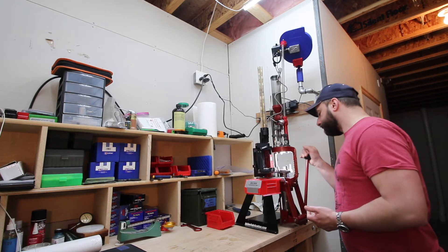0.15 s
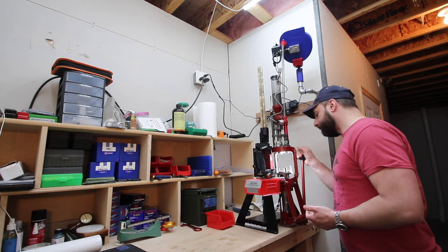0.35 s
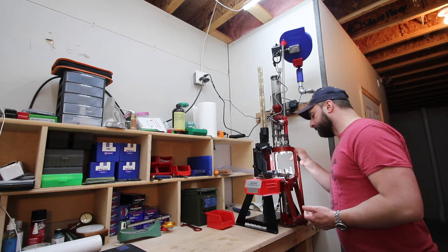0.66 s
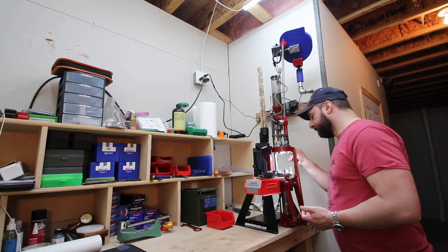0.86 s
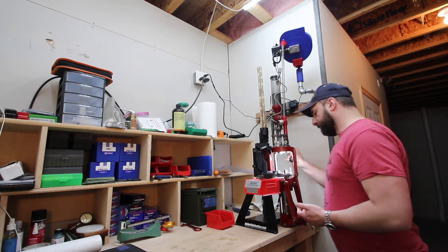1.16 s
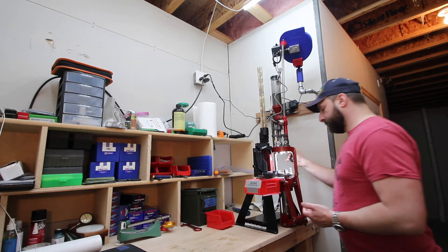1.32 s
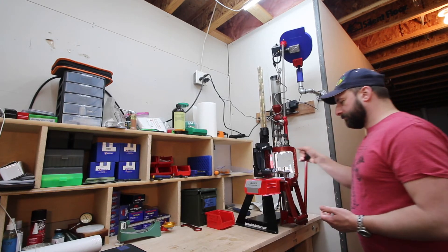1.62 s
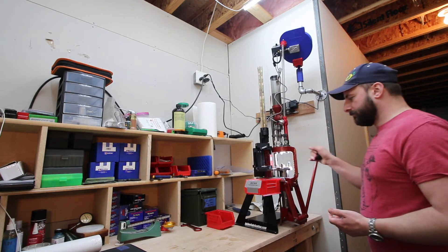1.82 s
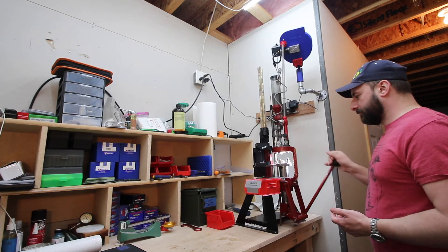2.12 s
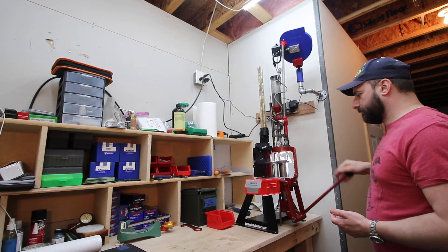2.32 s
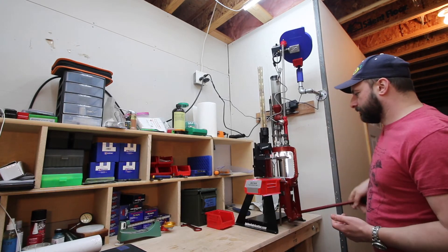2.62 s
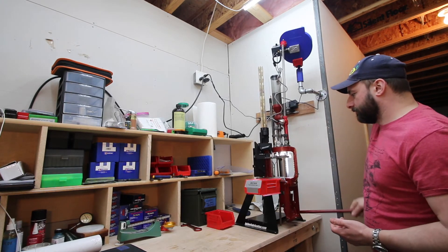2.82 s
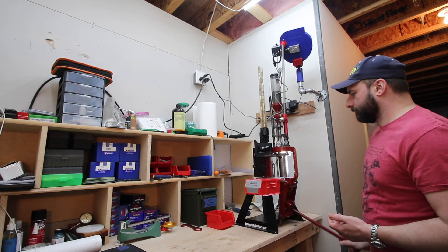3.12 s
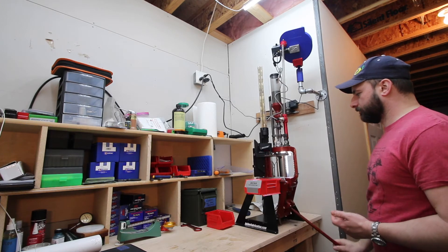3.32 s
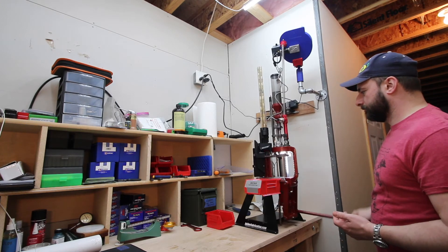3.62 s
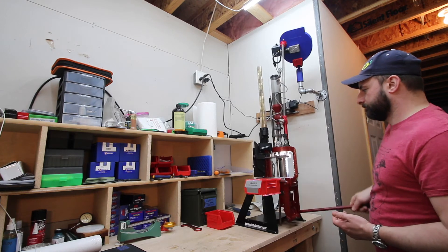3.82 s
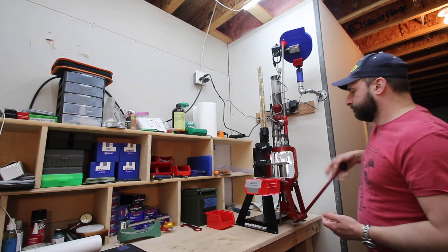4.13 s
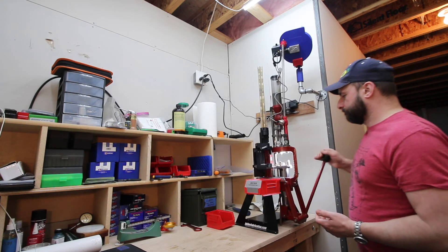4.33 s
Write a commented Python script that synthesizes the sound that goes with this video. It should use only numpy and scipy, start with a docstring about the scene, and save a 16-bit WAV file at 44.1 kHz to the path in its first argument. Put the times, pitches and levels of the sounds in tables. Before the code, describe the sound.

Quiet ticks and taps of handled metal open the scene, with a hollow tumbling rattle about half a second in. More soft clicks and short rubs follow, then a brass ring and a small lull. Louder iron clanks, gritty steel slides, a short groan and hum mark the lever's down stroke; the up stroke rattles and scrapes before fading. Close workshop reverberation, microphone a couple of metres away, faint room noise.

```python
"""A progressive reloading press worked by hand in a small workshop, a couple of metres from the microphone.
The lever goes down and up: blows ring the iron frame, slip grains scrape, and wavering tones squeal and hum.
Before that, small parts and brass cases are handled and one case rattles down a hollow chute, all as short
bursts of contacts filtered by resonances. Decaying notes give the ringing brass, loose parts and the thud of
the wooden bench at the end stops; noise tails give the room, and shaped noise its faint air."""
import sys
import numpy as np
from scipy import signal
from scipy.fft import rfft, irfft
from scipy.io import wavfile
from scipy.ndimage import uniform_filter1d

SR = 44100
rng = np.random.default_rng(int(sys.argv[2]) if len(sys.argv) > 2 else 0)


def pcm_store(signal):
    """Save signal as 16-bit PCM."""
    levels = np.round(np.clip(np.atleast_2d(signal), -1, 1) * 32767)
    wavfile.write(sys.argv[1], SR, levels.astype(np.int16).T)


N = 196774  # samples
BLOW_SIZE = 32768  # samples in one blow, note or room tail

# Small parts and cases in the hands. Each row: start in seconds, level in dB before the layer's gain,
# size of the part in cm, contact time in ms, rattle decay in seconds.
HANDLING_BLOWS = [(0.004, -40.5, 4.1, 0.72, 0.014), (0.025, -53, 18, 0.29, 0.03),
                  (0.147, -54, 12, 0.085, 0.0029), (0.157, -48, 6.3, 0.96, 0.0047),
                  (0.2245, -36.5, 1.83, 0.35, 0.0026), (0.326, -31.5, 7.8, 0.12, 0.0074),
                  (0.345, -23.5, 8.1, 0.26, 0.028), (0.435, -27.5, 8.4, 0.18, 0.025),
                  (0.458, -28, 5.9, 0.25, 0.0057), (0.496, -29, 10.7, 0.11, 0.0098),
                  (0.77, -41.5, 7, 0.18, 0.0071), (0.78, -34.5, 5.4, 0.49, 0.003),
                  (0.9, -65, 12, 1.2, 0.0063), (0.94, -52, 37, 0.14, 0.01), (1.03, -36.5, 150, 3.8, 0.06),
                  (1.051, -43, 11, 1.6, 0.0056), (1.105, -34.5, 33, 0.67, 0.012),
                  (1.132, -38, 17, 0.38, 0.005), (1.172, -40, 60, 2.8, 0.0038),
                  (1.222, -45, 13.3, 0.82, 0.0017), (1.378, -37.5, 6.9, 0.46, 0.016),
                  (1.45, -42, 9.9, 0.41, 0.013), (1.538, -38.5, 6.5, 0.26, 0.0068),
                  (1.59, -37.5, 7.2, 0.11, 0.0069), (1.66, -31, 13.7, 0.35, 0.011),
                  (1.778, -40, 6, 0.18, 0.013), (1.903, -33.5, 2.3, 0.11, .0012),
                  (1.955, -33, 6.9, 0.085, 0.017), (1.974, -25.5, 4.1, 0.16, .016),
                  (1.995, -20.5, 5.6, 0.63, 0.017), (2.003, -33.5, 47, 1.26, 0.013),
                  (2.19, -55.5, 6.2, 0.7, 0.028), (2.246, -52, 3.1, 0.22, 0.0022),
                  (2.263, -49.5, 9.5, 1.1, 0.0084)]
# A case bouncing down the chute. Each row: start in seconds, level in dB before the layer's gain,
# contact time in ms.
CHUTE_BOUNCES = [(0.518, -21, 0.18), (0.545, -24, 0.17), (0.567, -20, 0.37), (0.578, -17.5, 0.19),
                 (0.585, -23, 0.58), (0.609, -28.5, 0.87), (0.625, -19, 0.28), (0.652, -26.5, 0.65),
                 (0.671, -25.5, 0.76), (0.713, -31.5, 0.96)]
# Blows of the linkage, ram and shell plate. Each row: start in seconds, level in dB before the layer's gain,
# size of the part in cm, contact time in ms, rattle decay in seconds.
PRESS_BLOWS = [(2.423, -33, 4.4, 0.15, 0.0054), (2.44, -28.5, 32, .18, .015),
               (2.515, -33.5, 21, 0.27, 0.027), (2.613, -14, 9.9, 0.24, 0.0031),
               (2.68, -23, 6.8, 0.71, 0.048), (2.755, -28, 2.3, 0.19, 0.0033),
               (2.8, -23.5, 8.7, 0.15, 0.033), (2.966, -26.5, 45, 0.24, 0.03),
               (2.979, -17, 31.4, .14, 0.0061), (3.025, -18, 7.8, 0.91, .009),
               (3.046, -26, 9.4, 0.28, 0.0028), (3.086, -27, 12, 0.26, 0.0058), (3.287, -20.5, 65, 1, 0.01),
               (3.294, -17, 49, .4, 0.0039), (3.302, -23.5, 37, 0.21, 0.0065),
               (3.34, -24.5, 36, 0.45, 0.025), (3.536, -25, 19, 0.46, 0.0083),
               (3.547, -29.5, 10.4, 0.19, 0.002), (3.575, -21.5, 22.4, 0.39, 0.021),
               (3.658, -29, 0.69, 0.3, 0.014), (3.711, -15.5, 21, 0.18, 0.0032),
               (3.742, -23.5, 20, 0.095, 0.011), (3.768, -24.5, 15, 0.38, 0.066),
               (3.923, -24, 5.8, 0.1, 0.01), (3.933, -19, 25, 0.23, 0.014), (4.056, -23, 3.3, 0.2, 0.0019),
               (4.085, -25.5, 5.3, 0.15, 0.013), (4.411, -42.5, 4.6, .14, 0.0067),
               (4.425, -42, 5.4, 0.12, 0.01)]
# Slides, one curve each: a case pushed towards the chute, small parts rubbing as they are set in place,
# the lever eased forward, the lever down, the lever back up.
# Each row: time in seconds, level in dB before the band shares, brightness in dB per octave.
SLIDE_CURVES = [
    [(0.33, -58, 10), (0.39, -55, 3.5), (0.45, -45, 10), (0.54, -52, 0), (0.62, -48, 2.5)],
    [(0.8, -46, -3.5), (0.88, -59, 5), (1.02, -67.5, 5.5), (1.08, -56.5, -0.5), (1.25, -68, -1)],
    [(1.45, -71.5, -3), (1.55, -44, 0.1), (1.74, -48.5, 2), (1.8, -70, -7), (1.88, -51.5, 6.5)],
    [(2.44, -70, -1.5), (2.59, -37.5, -0.6), (2.67, -27.5, 0.5), (2.79, -35, 4), (2.88, -36.5, -0.7),
     (2.96, -34.5, -4), (3.07, -26.5, 0), (3.12, -47, -4.5), (3.2, -55, -3.5)],
    [(3.42, -47.5, -5), (3.49, -50, -4), (3.6, -44.5, -2), (3.72, -32.5, 0.5), (3.88, -36, -3),
     (3.93, -43, 1), (4.02, -25.5, 0), (4.08, -29.5, 2.5), (4.14, -44, 2.5)],
]
# The dry ram singing on its way down. Each row: time in seconds, level in dB.
SQUEAL_CURVE = [(2.62, -51), (2.65, -36), (2.72, -59), (2.84, -43), (2.89, -44), (2.95, -48), (2.98, -58)]
GROAN_CURVE = [(2.8, -63), (2.86, -33.5), (2.94, -32.5), (2.98, -23)]
# A long mode of the frame humming. Each row: time in seconds, level in dB.
HUM_CURVE = [(3.03, -32), (3.07, -29), (3.16, -39.5), (3.27, -50.5), (3.36, -74)]

# Resonances of the press on its bench, of the chute and of small parts.
# Each row: frequency in Hz, width in Hz, level in dB over the dense modes.
FRAME_RESONANCES = [(90.2, 11, 7), (129.2, 7.1, 10), (193.2, 21, 1.5), (266, 5.7, 0.5), (346.5, 36, -9),
                    (426.4, 31, 6.5), (749, 100, -6.5), (991, 44, -32), (1012, 37, -13), (1086, 8.4, 7),
                    (1330, 9.9, -3.5), (1440, 8, 6.5), (1522, 18, 3), (1800, 170, -9), (2121, 39, -7.5),
                    (2616, 70, -12), (3000, 48, -13.5), (3485, 210, -3.5), (3960, 170, -20.5),
                    (4500, 61, -13.5), (5320, 53, -8.5), (8040, 18, -0.5), (14500, 260, -1.5)]
CHUTE_RESONANCES = [(576, 70, 5.8), (755, 153, 12), (850, 14, 11), (865, 27, 14), (1058, 33, 1.3),
                    (1302, 28, 11), (2390, 85, 1)]
SMALL_PART_RESONANCES = [(318, 42, -26), (706, 105, -1.5), (1060, 40, -32), (1335, 91, -9.5), (1470, 51, 3),
                         (1783, 94, -2.5), (1950, 50, -19.5), (3320, 120, -32), (4200, 240, -9),
                         (4965, 270, 2.5), (9950, 590, 6.5)]

# Modes of an empty brass case, the wooden bench and a hollow part of the press.
# Each row: frequency in Hz, level in dB over the strike, time to fall 60 dB in seconds.
CASE_MODES = [(4838, 1, .21), (5572, -14, .15), (6756, -8, .05), (7908, -5.5, .36), (9885, -2, .08),
              (12420, -18, .1)]
BENCH_MODES = [(128.5, 0.5, 0.15), (192.3, -6.5, 0.17), (338, -1, 0.069)]
HOLLOW_MODES = [(707, -1.5, 0.15), (1280, -3, 0.13), (1446, -1.5, 0.15), (2260, -0.5, 0.038)]
# What sets them off: strikes on the case, end stops shaking the bench, a knock on the hollow part.
# Each row: start in seconds, level in dB before the layer's gain.
CASE_STRIKES = [(0.03, -64), (1.903, -33), (1.997, -25.5)]
END_STOPS = [(3.296, -13), (3.717, -14.5)]
HOLLOW_KNOCKS = [(1.378, -23.5)]
# Loose parts that ring with one note. Each row: start in seconds, frequency in Hz,
# level in dB before the layer's gain, time to fall 60 dB in seconds.
LOOSE_PINGS = [(0.098, 4790, -35.5, 0.032), (0.153, 1397, -28, 0.16), (0.169, 323, -31.5, 0.073),
               (0.228, 1654, -31.5, 0.088), (0.327, 9380, -29.5, 0.3), (0.773, 5380, -50, 0.74),
               (0.778, 235, -38.5, 0.58), (1.098, 1107, -28.5, 0.12), (1.17, 183, -27, 0.12),
               (1.78, 1395, -42.5, 0.61), (2.251, 999, -26, 0.126), (2.615, 14550, -37, 0.2),
               (2.98, 14100, -43, 0.2), (3.046, 1155, -27, 0.49), (3.086, 3644, -25, 0.15),
               (3.087, 3470, -30.5, .11), (3.31, 1146, -27.5, 0.46), (3.577, 1940, -25, 0.24),
               (3.66, 3240, -25, 0.13), (3.711, 746, -14, 0.18), (3.738, 5480, -33, 0.27)]

# Workshop reverberation. Each row: frequency in Hz, time to fall 60 dB in seconds.
ROOM_DECAY = [(100, 0.1), (500, 0.2), (1500, 0.2), (4000, 0.21), (11000, 0.16)]
# Colour of the room's air. Each row: frequency in Hz, relative level in dB per Hz.
AIR_COLOUR = [(24, -53), (40, -1.5), (113, 9.5), (206, 1.5), (321, 7.5), (478, -0.5), (643, 8.5),
              (7130, -22), (15000, -19.5)]
# Edges in Hz of the bands that colour a scrape, and the share in dB of each band.
SCRAPE_EDGES_HZ = [70, 250, 900, 2500, 6500, 15000]
SCRAPE_SHARES_DB = [-8.5, -1, -3, -8.5, -24.5]

# A part radiates above RING_HZ_CM / size, a contact excites below 1 / contact time; slopes in dB per octave.
RING_HZ_CM, SMALL_SLOPE_DB, SOFT_SLOPE_DB, TILT_DB = 9130, 16, 16.5, 5.5
FAR_KNEE, FAR_SLOPE_DB = 2.48, 10  # this many times above the contact's edge the treble falls faster still
RUN_UP_SHARE = 0.33  # the run-up's growth time as a share of the rattle decay
TYPICAL_RATTLE_S = 0.0063  # the longer a part rattles, the more of the blow goes into its chatter
SHIELDED_DB = 0.9  # long rattles come from deep in the press: more room sound per doubling of the decay
LEVEL_S = 0.05  # the level of a blow is its energy spread over this time


def amp(db):
    """Decibels to gain."""
    return 10 ** (np.asarray(db) / 20)


def unit(x):
    """Scale to an rms of one."""
    return x / np.sqrt(np.mean(x ** 2) + 1e-20)


def log_interp(size, hz, values):
    """Values at all bins of a spectrum, joined on a log-frequency axis."""
    bins_hz = np.fft.rfftfreq(size, 1 / SR)
    return np.interp(np.log(bins_hz + 1), np.log(hz), values)


def add(out, s, x):
    """Mix a sound in at a time."""
    start = int(s * SR)
    x, start = x[max(-start, 0):], max(start, 0)
    out[start:start + len(x)] += x[:max(len(out) - start, 0)]


def air(level_db=-68.5):
    """Faint steady room noise: random pressure coloured across the spectrum."""
    hz, db = np.transpose(AIR_COLOUR)
    noise = rfft(rng.standard_normal(N))
    return amp(level_db) * unit(irfft(noise * amp(log_interp(N, hz, db)), N))


def echoes(build_s=0.00096):
    """Diffuse answer of the workshop, of unit energy; each part of the spectrum dies at its own pace."""
    t = np.arange(BLOW_SIZE) / SR
    hz, t60 = np.transpose(ROOM_DECAY)
    noise = rfft(rng.standard_normal(BLOW_SIZE))
    tail = np.zeros(BLOW_SIZE)
    for share, decay in zip(np.eye(len(hz)), t60):
        part = irfft(noise * log_interp(BLOW_SIZE, hz, share))
        tail += part * np.exp(-np.log(1000) * t / decay)
    tail = tail * (1 - np.exp(-t / build_s))
    return tail / np.linalg.norm(tail)


def with_room(x, wet_db):
    """The direct sound plus the workshop's answer."""
    return x + amp(wet_db) * signal.fftconvolve(x, echoes())[:N]


def grains(size, rate, scatter_db):
    """Random tiny contacts, so many per second, a few much harder than the rest."""
    hardness = amp(scatter_db * np.minimum(rng.exponential(size=size), 4))
    return (rng.random(size) < rate / SR) * rng.choice([-1, 1], size) * hardness


def body(modes, size, bed_hz=150):
    """Frequency response of an object: resonances standing out of dense modes that thin in the bass."""
    f = np.fft.rfftfreq(size, 1 / SR)
    bed = (1j * f / (bed_hz + 1j * f)) ** 2
    return bed + sum(amp(db) / (1 + 2j * (f - hz) / width) for hz, width, db in modes)


def loose_part(count=7, ring_db=7, width_hz=90, lo_hz=2200, hi_hz=14500):
    """Every blow also jingles some small steel or brass piece with a few narrow modes of its own."""
    f = np.fft.rfftfreq(BLOW_SIZE, 1 / SR)
    pitches = lo_hz + (hi_hz - lo_hz) * rng.random(count)
    return 1 + sum(amp(ring_db) / (1 + 2j * (f - hz) / width_hz) for hz in pitches)


def roll_off(ratio, slope_db):
    """Gain in dB: nearly flat while the ratio is under one, then falling by the slope per octave."""
    return -10 * np.log10(1 + 10 ** (slope_db * np.log2(ratio) / 10))


def contact_colour(size_cm, contact_ms):
    """Spectrum of a blow in dB: bigger parts reach lower, shorter contacts reach higher."""
    f = np.maximum(np.fft.rfftfreq(BLOW_SIZE, 1 / SR), 20)
    cycles = f * contact_ms / 1000
    bass = roll_off(RING_HZ_CM / size_cm / f, SMALL_SLOPE_DB)
    treble = roll_off(cycles, SOFT_SLOPE_DB) + roll_off(cycles / FAR_KNEE, FAR_SLOPE_DB)
    return bass + treble - TILT_DB * np.log2(f / f[0])


def causal(db):
    """Minimum-phase response with the given gain, so the colour never rings ahead of a contact."""
    cepstrum = irfft(db * np.log(10) / 20)
    half = len(cepstrum) // 2
    cepstrum[1:half] *= 2
    cepstrum[half + 1:] = 0
    return np.exp(rfft(cepstrum))


def blows(table, modes, gain_db, chatter_db, wet_db, lead_s=0.06):
    """Each blow is a run-up of small contacts, a hard one and a fading chatter, ringing an object and the room."""
    out, t = np.zeros(N), np.arange(BLOW_SIZE) / SR
    ring = body(modes, BLOW_SIZE)
    ending = np.clip(2 - 2 * t / t[-1], 0, 1) ** 2
    for s, db, size_cm, contact_ms, rattle_s in table:
        swell = np.exp(np.minimum((t - lead_s) / RUN_UP_SHARE, lead_s - t) / rattle_s)
        chatter = grains(BLOW_SIZE, rate=2500, scatter_db=4) * swell
        chatter = chatter / (np.linalg.norm(chatter) + 1e-9)
        force = amp(chatter_db) * np.sqrt(rattle_s / TYPICAL_RATTLE_S) * chatter
        force[int(lead_s * SR)] += 1  # the hard contact
        room_db = wet_db + SHIELDED_DB * np.log2(rattle_s / TYPICAL_RATTLE_S)
        spectrum = rfft(force) * ring * loose_part()
        spectrum = spectrum * (1 + amp(room_db) * rfft(echoes()))
        sound = ending * irfft(spectrum * causal(contact_colour(size_cm, contact_ms)))
        loudness = amp(db) * np.sqrt(LEVEL_S * SR)
        add(out, s - lead_s, loudness * sound / np.linalg.norm(sound))
    return out * amp(gain_db)


def handling():
    """Small parts and cases touch and rattle, each contact exciting their resonances."""
    return blows(HANDLING_BLOWS, SMALL_PART_RESONANCES, gain_db=-1, chatter_db=11.5, wet_db=2.5)


def note(hz, db, t60, twin_db=-13, split_hz=23):
    """A freely decaying mode that beats with a weaker twin, as the part is not quite round."""
    t = np.arange(BLOW_SIZE) / SR
    twin_hz = hz + min(split_hz, 0.0079 * hz)
    pair = np.sin(2 * np.pi * hz * t) + amp(twin_db) * np.sin(2 * np.pi * twin_hz * t)
    onset = 1 - np.exp(-t / 0.0014)
    return amp(db) * pair * np.exp(-np.log(1000) * t / t60) * onset


def ringing(wet_db=-9, gain_db=-2):
    """Brass cases, the bench, a hollow part and loose parts ring on in their own modes after a knock."""
    out = np.zeros(N)
    struck = (CASE_MODES, CASE_STRIKES), (BENCH_MODES, END_STOPS), (HOLLOW_MODES, HOLLOW_KNOCKS)
    for modes, strikes in struck:
        for s, strike_db in strikes:
            add(out, s, sum(note(hz, db + strike_db, t60) for hz, db, t60 in modes))
    for s, hz, db, t60 in LOOSE_PINGS:
        add(out, s, note(hz, db, t60))
    return amp(gain_db) * with_room(out, wet_db)


def curve(rows, start_s=0.01, fade_s=0.029):
    """Gain that follows rows of time and dB; it starts quickly and dies away after the last row."""
    rows, t = np.array(rows), np.arange(N) / SR
    start = np.clip((t - rows[0, 0]) / start_s + 1, 0, 1)
    fade = np.exp(-np.maximum(t - rows[-1, 0], 0) / fade_s)
    return start * fade * amp(np.interp(t, rows[:, 0], rows[:, 1]))


def band(x, lo_hz, hi_hz):
    """Steep band-pass."""
    sos = signal.butter(4, [lo_hz, min(hi_hz, .45 * SR)], "band", fs=SR, output="sos")
    return signal.sosfilt(sos, x)


def catches(rate=45, depth_db=3.0):
    """Gain of a slide that grabs and lets go at random, with so many random levels per second."""
    steps = np.arange(N) / SR * rate
    return amp(depth_db * np.interp(steps, np.arange(N), rng.standard_normal(N)))


def sliding(dull_hz=8000, pivot_hz=1460):
    """Steel sticks and slips on steel; the slips ring the press on its bench."""
    slips = with_room(grains(N, rate=800, scatter_db=4.5) * catches(), wet_db=0)
    dulling = (1 + 1j * np.fft.rfftfreq(N, 1 / SR) / dull_hz) ** 2
    scrape = irfft(rfft(slips) * body(FRAME_RESONANCES, N) / dulling, N)
    out = np.zeros(N)
    for share_db, lo, hi in zip(SCRAPE_SHARES_DB, SCRAPE_EDGES_HZ, SCRAPE_EDGES_HZ[1:]):
        # brightness tilts the level about the pivot pitch
        octaves = np.log2(np.sqrt(lo * hi) / pivot_hz)
        pressure = sum(curve([(s, db + bright * octaves) for s, db, bright in rows]) for rows in SLIDE_CURVES)
        out += amp(share_db) * pressure * unit(band(scrape, lo, hi))
    return out


def chute():
    """A case bounces down the hollow chute, every bounce ringing its resonances."""
    # every bounce strikes a part of 12.1 cm and rattles with a decay of 0.0045 s
    bounces = [(s, db, 12.1, contact_ms, 0.0045) for s, db, contact_ms in CHUTE_BOUNCES]
    return blows(bounces, CHUTE_RESONANCES, gain_db=-2, chatter_db=2.5, wet_db=5.5)


def clanks():
    """Linkage, ram and shell plate strike and ring the iron frame."""
    return blows(PRESS_BLOWS, FRAME_RESONANCES, gain_db=-0.5, chatter_db=8, wet_db=5.0)


def singing(rows, hz, waver_hz):
    """One mode kept going by the moving press, its pitch wavering by so many Hz rms."""
    waver = unit(uniform_filter1d(rng.standard_normal(N), size=300))
    phase = 2 * np.pi * np.cumsum(hz + waver_hz * waver) / SR
    return curve(rows) * unit(np.sin(phase))


def dry_ram():
    """The dry ram squeals high and groans low on its way down, each in one sustained mode."""
    return singing(SQUEAL_CURVE, 8043, waver_hz=8.2) + singing(GROAN_CURVE, 423, waver_hz=14)


def frame_hum():
    """A long mode of the iron frame swells, then hums away."""
    return singing(HUM_CURVE, 1421, waver_hz=10)


def scene(side_db=-37, air_side_db=-12):
    """All sources come from one spot; only a trace of the room and its air differs between left and right."""
    mid = air() + handling() + ringing() + sliding() + chute() + clanks() + dry_ram() + frame_hum()
    room_side = amp(side_db) * signal.fftconvolve(mid, echoes())[:N]
    side = room_side + amp(air_side_db) * air()
    return np.array([mid + side, mid - side])


def record(dry, low_hz=76, ceiling=0.82, top_hz=15800):
    """The microphone drops the deep bass, rounds the hardest peaks and cuts the top."""
    thin = signal.sosfilt(signal.butter(7, low_hz, "high", fs=SR, output="sos"), dry)
    rounded = thin / (1 + (thin / ceiling) ** 6) ** (1 / 6)
    return signal.sosfilt(signal.ellip(10, .2, 80, top_hz, fs=SR, output="sos"), rounded)


dry = scene()
out = record(dry)
pcm_store(out)
```